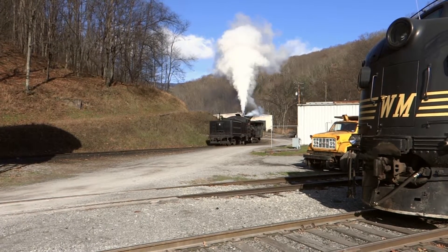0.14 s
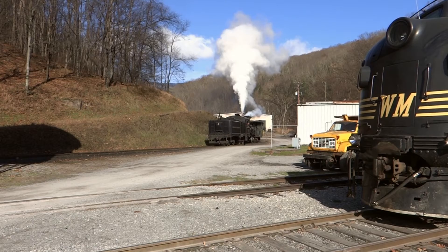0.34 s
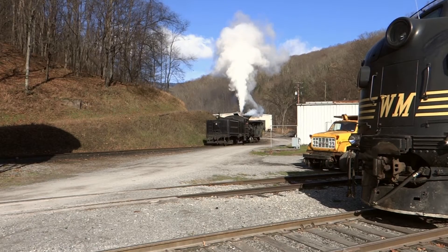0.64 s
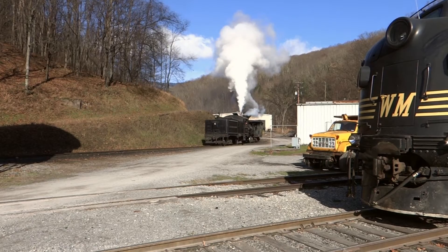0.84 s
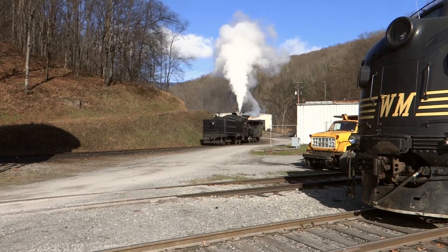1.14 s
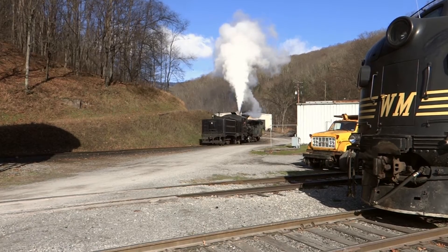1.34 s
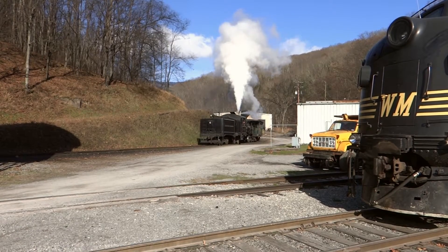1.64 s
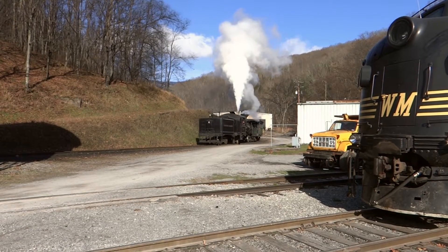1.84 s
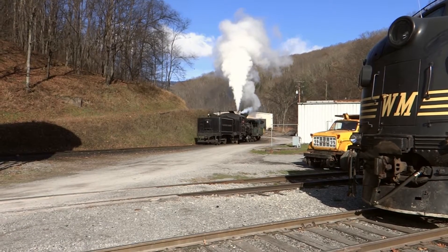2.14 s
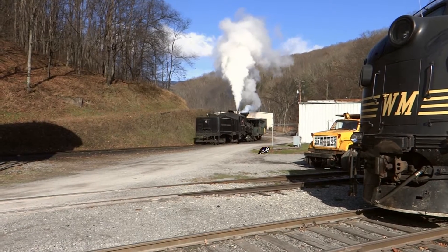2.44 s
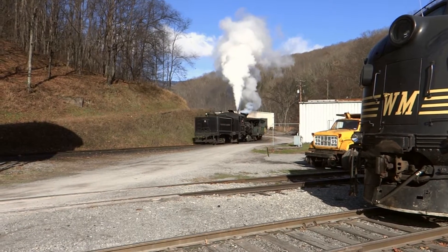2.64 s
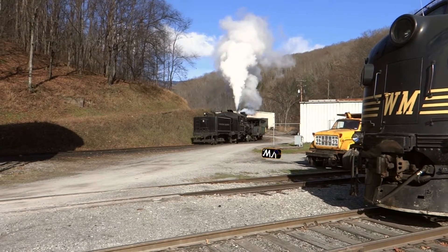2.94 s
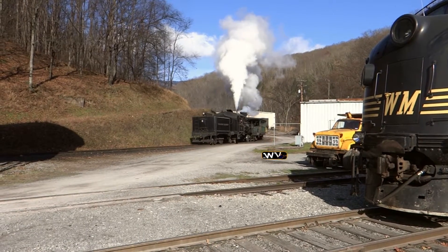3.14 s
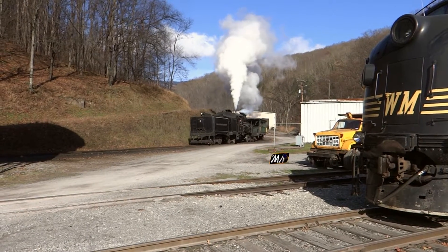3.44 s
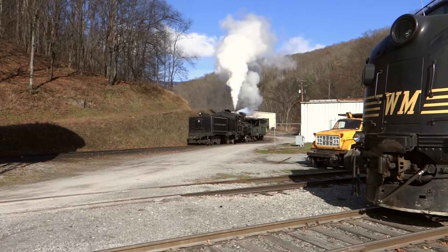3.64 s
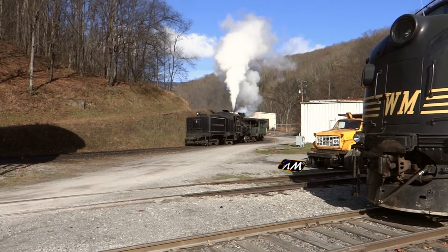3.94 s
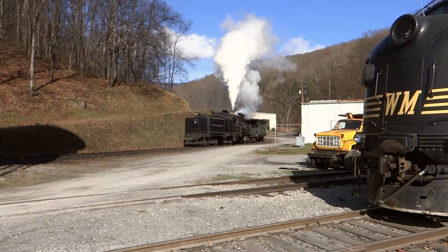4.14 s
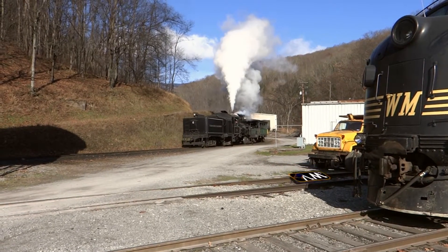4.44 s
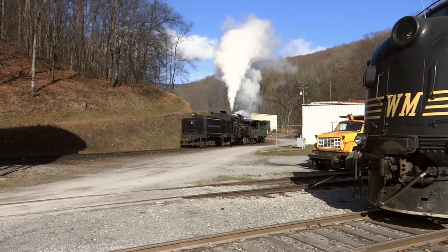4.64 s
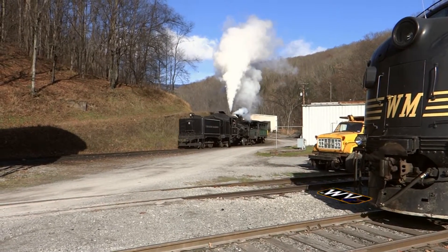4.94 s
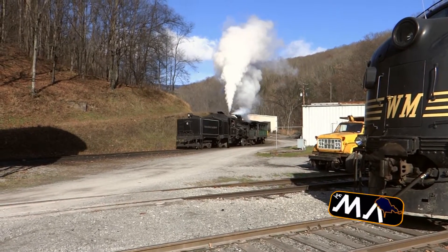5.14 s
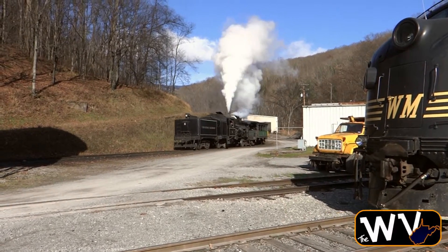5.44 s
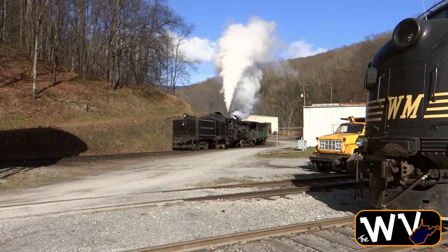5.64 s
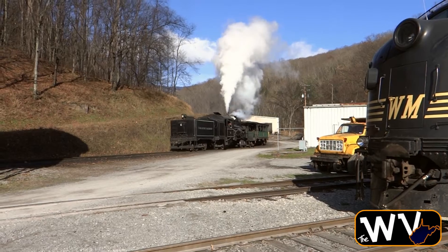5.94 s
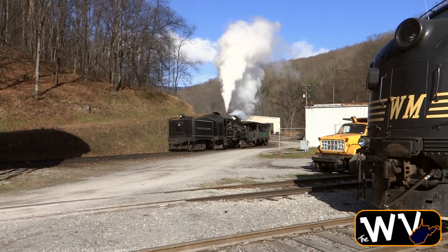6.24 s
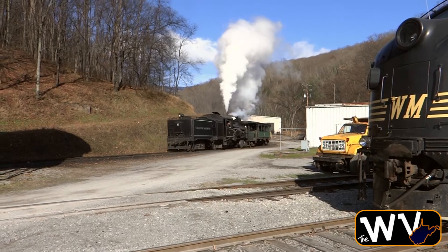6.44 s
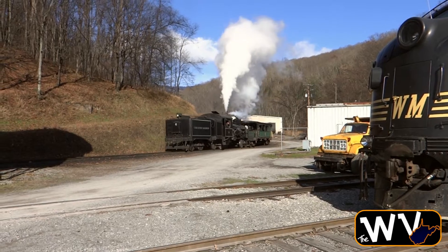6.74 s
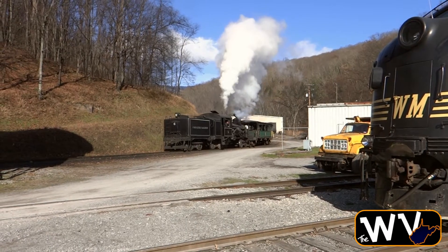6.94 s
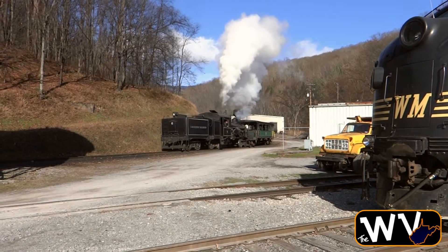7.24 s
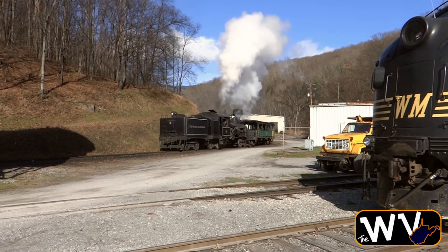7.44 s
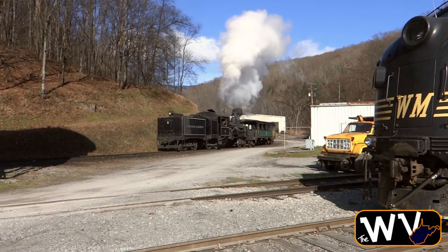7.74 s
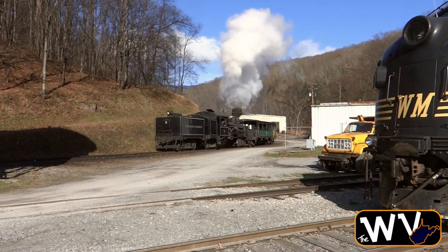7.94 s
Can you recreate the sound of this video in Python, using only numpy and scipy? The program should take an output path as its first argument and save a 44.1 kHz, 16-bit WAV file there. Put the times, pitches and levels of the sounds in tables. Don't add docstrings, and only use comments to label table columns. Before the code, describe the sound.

A steam engine's safety valve roars with broad bright hiss and a thin high screech, thins, squeaks and snaps shut, leaving soft chuffs and bird chips.

```python
import sys
import numpy as np
from scipy import signal
from scipy.fft import rfft, irfft
from scipy.io import wavfile
from scipy.ndimage import uniform_filter1d

SR = 44100
rng = np.random.default_rng(int(sys.argv[2]) if len(sys.argv) > 2 else 0)


def boost(x):
    u = np.asarray(x, float) / 20
    return 10 ** u


def wav_record(signal):
    frames = np.transpose(np.atleast_2d(signal))
    bounded = np.clip(frames, -1, 1)
    quanta = np.round(bounded * 32767).astype(np.int16)
    wavfile.write(sys.argv[1], SR, quanta)


N = 356749

# start_s, level_db, lowered (valve travel: 0 wide open, 1 nearly seated)
JET = [(0, -15.5, 0.16), (.8, -17.5, 0.069), (1.15, -17.5, 0.14), (1.45, -16.5, .21), (2.3, -18, 0.18),
       (3, -17.5, 0.28), (3.5, -18.5, .4), (3.65, -19.5, 0.41), (4.5, -22.5, 0.67), (4.95, -24, .65),
       (5.1, -23, 0.66), (5.6, -23, 0.55), (5.95, -25.5, 0.76), (6.3, -26, 0.64), (7.0, -24.5, .55),
       (7.1, -24, 0.37)]
# middle_s, half_length_s, size_db
FLARES = [(.86, .02, 2.5), (2.38, 0.02, 0.5), (2.74, .04, 1.5), (3.11, 0.013, 4), (3.26, 0.017, -0.5),
          (3.52, 0.015, -0.5), (3.57, 0.023, 4), (3.68, 0.082, 3.5), (3.95, 0.01, 4.5), (4.08, 0.035, 3),
          (4.25, .03, 2), (4.33, .02, 2.5), (5.14, 0.085, -1.5), (5.79, 0.029, 4.5), (6.05, 0.081, 5),
          (6.255, 0.032, 2), (6.44, .04, 1.5), (7.015, 0.021, 3.5)]
SHUT_S = 7.18
HZ = np.fft.rfftfreq(1024, 1 / SR)[:, None]
FRAMES = np.arange(N // 256 + 5) * 256 / SR


def evened(x):
    return x / np.sqrt(np.mean(x ** 2) + 1e-20)


def read(points, hz):
    f, value = np.transpose(points)
    return np.interp(np.log(hz + 1), np.log(f + 1), value)


def columns(rows, t):
    s, *rest = np.transpose(rows)
    return [np.interp(t, s, c) for c in rest]


def bumps(rows, t):
    return sum(size * np.exp(-((t - s) / half) ** 2) for s, half, size in rows)


def drift(seconds, size=N, per_s=SR):
    span = max(round(seconds * per_s), 1)
    smooth = uniform_filter1d(rng.standard_normal(size), span)
    return evened(uniform_filter1d(smooth, span))


def frame_drift(seconds):
    return drift(seconds, size=len(FRAMES), per_s=SR / 256)


def add(mix, s, sound):
    part = mix[round(s * SR):][:len(sound)]
    part += sound[:len(part)]


def noise(db, patchy_db):
    a, b, patches = rng.standard_normal((len(FRAMES), len(HZ), 3)).T
    patches = evened(uniform_filter1d(uniform_filter1d(patches, 14, 0), 12, 1))
    z = (a + 1j * b) * boost(db + patchy_db * patches)
    return signal.istft(z, nperseg=1024, noverlap=768)[1][:N] / np.sqrt(3)


def shape(points, lo_hz, hi_hz):
    db = read(points, HZ)
    inside = (HZ > lo_hz) * (HZ < hi_hz)
    return db - 10 * np.log10(np.sum(boost(2 * db) * inside))


def jet():
    # pitch_hz, level_db (per Hz)
    open_roar = [(190, -53.5), (330, -23.5), (757, -8), (921, -4), (1190, -3.5), (1300, -7.5), (1510, -10),
                 (2190, 3.5), (2600, -7), (3320, 0.5), (3720, -8), (4270, -5.5), (4630, -16.5),
                 (5200, -1.5), (6760, -24), (11400, -120)]
    lowered_roar = [(190, -55), (330, -56), (416, -33.5), (594, -16), (766, -20), (943, -10.5),
                    (1200, -9.5), (1410, -12.5), (1740, 4.5), (1950, -8), (2190, -1), (2510, -7), (2760, 4),
                    (3640, -4), (5200, -0.5), (6760, -16), (11400, -120)]
    # pitch_hz, level_db (per Hz)
    fizz_colour = [(300, -70), (2700, -34), (4600, -9), (5500, -4), (6300, -8.5), (6900, -9), (9100, -7),
                   (10500, -15), (11800, -20.5), (12800, -32.5), (14000, -32.5), (15000, -44.5),
                   (15800, -31)]
    # pitch_hz, width_hz, change_db
    ripples = [(1634, 36, -5), (2150, 810, -8.5), (3180, 380, -16), (4400, 77, 0), (5240, 160, -20.5),
               (6360, 190, 4.5), (5400, 54, -2), (9000, 310, -8), (9550, 93, -23)]
    level_db, lowered = columns(JET, FRAMES)
    roar_db = level_db - bumps(FLARES, FRAMES)
    fizz_db = -26 + 0.79 * (roar_db + 17) + 10.5 * lowered
    gust = np.clip(frame_drift(.012), -1.6, 1.4)

    comb_db = sum(0.18 * db * np.exp(-((HZ - hz) / width) ** 2) for hz, width, db in ripples)
    shock_hz = 4830 + 860 * lowered
    shock_db = 5.5 * lowered
    comb_db = comb_db + shock_db * np.exp(-((HZ - shock_hz) / 260) ** 2)

    colour = (1 - lowered) * shape(open_roar, 500, 4000) + lowered * shape(lowered_roar, 500, 3650)
    roar = noise(colour + comb_db + roar_db + 1.54 * gust, patchy_db=0.2)

    sharp_db = -3 + 2.3 * FRAMES + 1.5 * frame_drift(.06)
    tilt_db = sharp_db * np.clip((HZ - 10500) / 3000, 0, 1)
    fizz_db = shape(fizz_colour, 6670, 10700) + comb_db + tilt_db + fizz_db + 1.1 * gust
    fizz = noise(fizz_db, patchy_db=0.33)
    crackle = boost(0.93 * drift(0.0013))
    return boost(3.0) * roar + boost(4.5) * fizz * crackle


def screech(scatter_hz):
    # start_s, level_db, octave_db, jitter_hz
    tone_rows = [(0, -27.5, -54, 36), (.45, -22.5, -49, 63), (1.08, -21, -45.5, 65), (1.5, -25.5, -54, 109),
                 (2, -21.5, -43, 57), (2.5, -21.5, -32, 29.5), (3.4, -20.5, -39.5, 19.4),
                 (3.7, -19, -36.5, 13.4), (4.97, -15.5, -34.5, 7.2), (5.1, -21, -36, 8.2),
                 (5.4, -18.5, -28, 5.8), (5.92, -19, -23, 10), (6.0, -19.5, -25, 8.5),
                 (6.5, -14.5, -34.5, 16), (6.63, -30, -45, 90), (6.7, -16, -32, 18), (7.07, -21, -32.5, 20),
                 (7.11, -21, -45, 55)]
    # start_s, pitch_hz
    pitch_rows = [(0, 5721), (.7, 5795), (1.12, 5803), (1.6, 5757), (2.8, 5788), (3.3, 5848), (4.5, 5915),
                  (5.65, 5935), (5.95, 6010), (6.1, 6095), (6.85, 6125), (7.12, 6196)]
    # middle_s, half_length_s, change_hz
    surges = [
        (1.52, .1, -90),
        (5.505, .06, 110),
        (5.705, .035, 125),
        (5.805, .03, 130),
        (5.855, .015, 75),
        (6.03, .055, 125),
        (6.275, .045, 85),
        (6.54, .055, 75),
        (6.635, .06, 260),
        (7.09, .035, 150),
    ]
    t = np.arange(N) / SR
    flare_db = bumps(FLARES, t)
    level_db, octave_db, jitter_hz = columns(tone_rows, t)
    hz = columns(pitch_rows, t)[0] + bumps(surges, t) + 9 * drift(0.04094)
    level_db = level_db + flare_db + 0.6 * drift(0.017)
    octave_db = octave_db - 2.5 * flare_db + 2.8 * drift(0.021)
    jitter_hz = jitter_hz + scatter_hz

    turn = 2 * np.pi * np.cumsum(hz) / SR
    slip = 2 * np.pi * np.cumsum(jitter_hz * drift(0.00242)) / SR
    flutter_db = (0.16 + 0.04 * jitter_hz) * drift(0.0044) + 0.58 * drift(0.013)
    tone = boost(level_db + 1.9 + flutter_db) * np.sin(turn + slip)
    octave = boost(octave_db - 0.6 + 1.94 * flutter_db) * np.sin(2 * turn + 1.2 * slip)
    return tone + octave


def engine():
    # pitch_hz, level_db (per Hz)
    boiler = [(12, -52.5), (20, -28), (59, -23), (91, -3.5), (124, -6.5), (172, -1), (326, -10.5),
              (420, -9), (550, -26), (920, -120)]
    turns = [-.45, .47, 1.392, 2.313, 3.21, 4.111, 5.0, 5.9, 6.84, 7.772, 8.7]
    # level_db (over the rumble), pitch_hz
    beats = [
        (11, 168),
        (9, 166),
        (5, 170),
        (5, 182),
    ]
    effort = [-5, -2, -2, -4.5, -3.5, 0, -5.5, -2.5, -1.5, -8]
    level_db = -39 + 1.75 * (columns(JET, FRAMES)[0] + 17) - bumps(FLARES, FRAMES)
    level_db = level_db + 8 * np.maximum(FRAMES - SHUT_S + .3, 0)
    out = noise(shape(boiler, 60, 330) + level_db + 3.0, patchy_db=0.1)

    t = np.arange(round(.12 * SR)) / SR
    swell = t / 0.014 * np.exp(1 - t / 0.017)
    for beat in range(2, 38):
        s = np.interp(beat / 4, np.arange(len(turns)), turns)
        db, hz = beats[beat % 4]
        db = db + effort[beat // 4] + np.interp(s, FRAMES, level_db)
        push = np.sin(2 * np.pi * hz * t + 1.01 * drift(0.008, size=len(t)))
        puff = uniform_filter1d(np.gradient(drift(.0011, size=len(t))), 30) * 16
        add(out, s, boost(db - 3.0) * swell * (push + 0.66 * puff))
    return out


def hills(x):
    # pitch_hz, fade_s (to fall by 60 dB)
    fade = [(300, 1.4), (1000, 2.1), (2500, 1.9), (4500, 1.15), (6200, 1.05), (8000, 0.72), (10000, 0.6),
            (13000, 0.44)]
    taps = np.zeros((2, 2 * SR))
    at = np.arange(900, 2 * SR - 20, 20)
    at = at + rng.integers(0, 20, (2, len(at)))
    np.put_along_axis(taps, at, rng.choice([-1., 1.], at.shape), 1)
    hz, t, z = signal.stft(taps, SR, nperseg=256)
    fade_db = -60 * t / read(fade, hz)[:, None]
    tail = signal.istft(z * boost(fade_db), SR, nperseg=256)[1]
    return signal.fftconvolve(x[None], tail / np.linalg.norm(tail[0]), axes=1)[:, :N]


def yard_air():
    # pitch_hz, level_db (per Hz)
    yard_colour = [(150, -22.5), (250, -12), (312, -36.5), (456, -8.5), (552, -5.5), (860, -15),
                   (2260, -19.5), (5750, -38.5), (6030, -38), (7170, -41), (11000, -51), (14300, -78),
                   (22000, -120)]
    duck_db = -4.5 * np.clip((SHUT_S - FRAMES) / .5 + 1, 0, 1)
    return noise(shape(yard_colour, 330, 5000) - 48.5 + 3.5 + duck_db, patchy_db=2.0)


def squeaks():
    # start_s, length_s, from_hz, to_hz, level_db
    squeak_rows = [(6.528, 0.078, 6670, 6900, -35.5), (6.537, .014, 5727, 5530, -29.5),
                   (6.564, 0.052, 9500, 8600, -27), (6.598, .035, 7600, 7480, -21),
                   (6.61, 0.051, 8570, 8180, -28.5), (6.62, 0.031, 6270, 6500, -25),
                   (6.645, 0.038, 7570, 7400, -20.5), (6.682, 0.062, 7630, 7360, -29),
                   (6.786, .025, 7440, 7500, -40.5), (7.075, .014, 8920, 7900, -18),
                   (7.088, 0.012, 7780, 7500, -19.5), (7.093, 0.018, 6860, 6930, -30)]
    out = np.zeros(N)
    for s, length, from_hz, to_hz, db in squeak_rows:
        n = round(length * SR)
        wobble_hz = 45 + 0.44 * abs(to_hz - from_hz)
        hz = np.linspace(from_hz, to_hz, n) + wobble_hz * drift(0.0015, size=n)
        level = boost(db + 5.5 + 2.2 * drift(0.0024, size=n)) * signal.windows.tukey(n, .4)
        add(out, s, level * np.sin(2 * np.pi * np.cumsum(hz) / SR))
    return out


def bird():
    # start_s, level_db, sweep_height_hz
    chips = [
        (7.722, -58, 1900),
        (7.777, -52.5, 2620),
        (7.836, -53, 2950),
        (7.895, -52, 3200),
        (7.955, -65, 1200),
        (7.977, -58, 1000),
    ]
    out = np.zeros(N)
    u = np.linspace(-.85, 1, round(0.0145 * SR))
    for s, db, height_hz in chips:
        turn = 2 * np.pi * np.cumsum(6850 + height_hz * u ** 2) / SR
        chip = boost(db + 1.0 - 15 * abs(u)) * np.sin(turn) * signal.windows.tukey(len(u), .2)
        add(out, s, chip)
        add(out, s + .011, boost(-13 - 14 * abs(u)) * chip)
    return out


def scene():
    # pitch_hz, level_db (side minus middle)
    side_db = [(30, -50), (60, -36), (130, -43), (290, -43), (640, -22.5), (1410, -23.5), (3100, -22),
               (6820, -21.5), (15000, -17)]
    # start_s, share_to_left
    lean = [(0, .01), (4.7, -.04), (5.2, -.01), (6.2, -.03), (7.2, 0)]
    t = np.arange(N) / SR
    jet_closing = np.clip((SHUT_S - t) / 0.14, 0, 1)
    screech_closing = np.clip((SHUT_S + 0.019 - t) / 0.03, 0, 1)
    hiss = jet() * jet_closing + 0.83 * squeaks()
    valve = hiss + screech(scatter_hz=0) * screech_closing
    scattered = hiss + screech(scatter_hz=29.45) * screech_closing
    slap = 0.1 * np.roll(scattered, round(.034 * SR))
    near = engine() + bird()
    echo, other = hills(scattered + 0.54 * near)
    yard = yard_air()

    mid = boost(2.0) * (valve + slap) + boost(-9) * echo + near + yard
    across = boost(2.5) * other + np.roll(boost(7.0) * near + yard, round(.031 * SR))
    side_gain = boost(read(side_db, np.fft.rfftfreq(N, 1 / SR)))
    side = irfft(rfft(across) * side_gain, N)
    side += columns(lean, t)[0] * mid
    return np.array([mid + side, mid - side])


def low_pass(x):
    return signal.sosfilt(signal.butter(12, 15760, fs=SR, output="sos"), x)


def record(dry):
    ceiling = 0.58
    rounded = np.tanh(dry / ceiling)
    bass_cut = signal.butter(2, 34, "high", fs=SR, output="sos")
    thin = signal.sosfilt(bass_cut, rounded)
    return low_pass(ceiling * thin)


dry = scene()
out = record(dry)
wav_record(out)
```